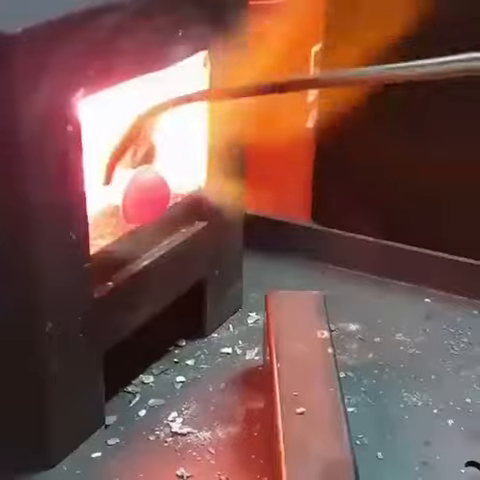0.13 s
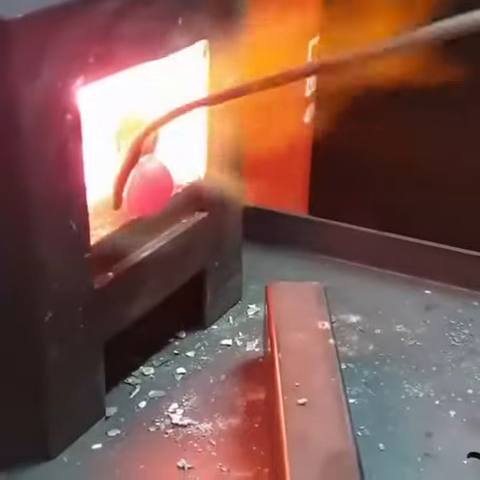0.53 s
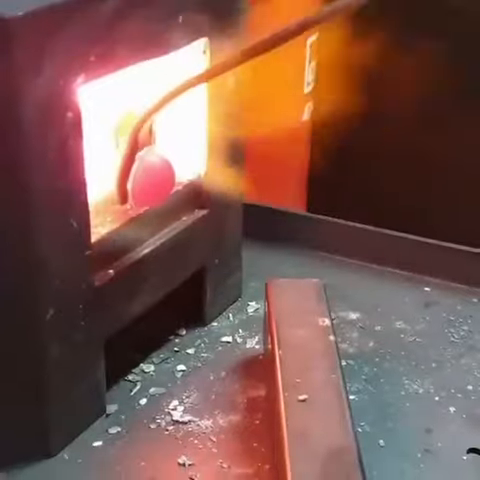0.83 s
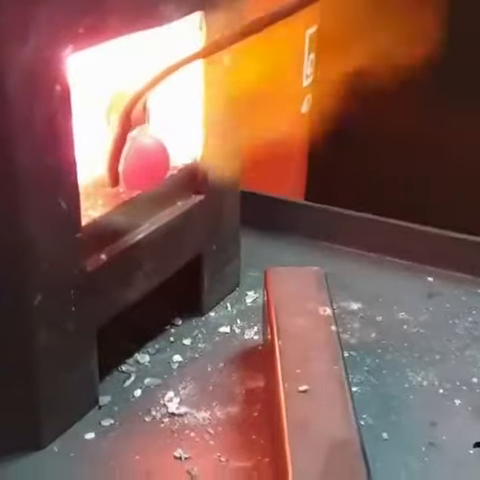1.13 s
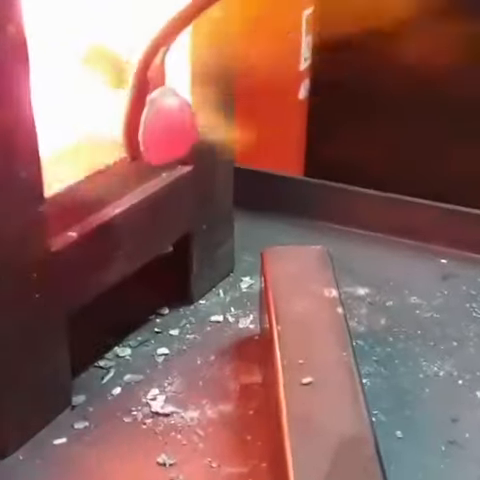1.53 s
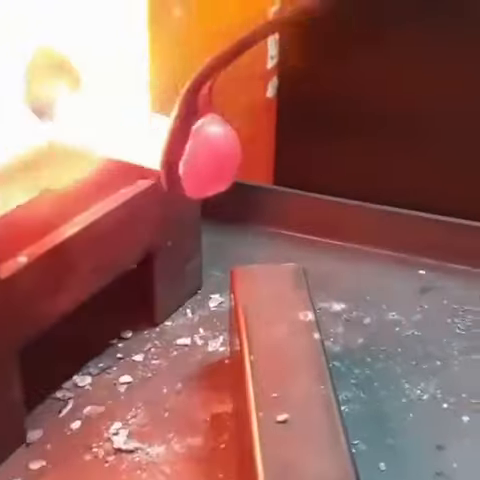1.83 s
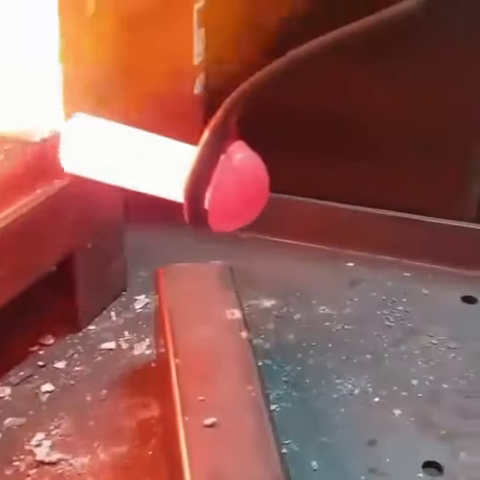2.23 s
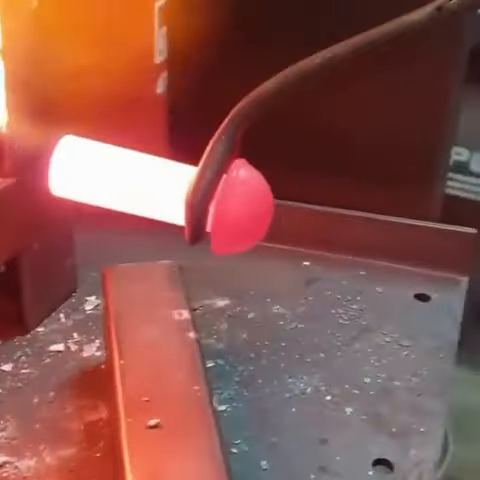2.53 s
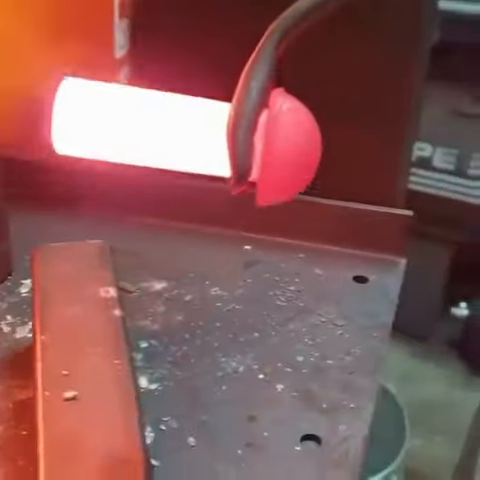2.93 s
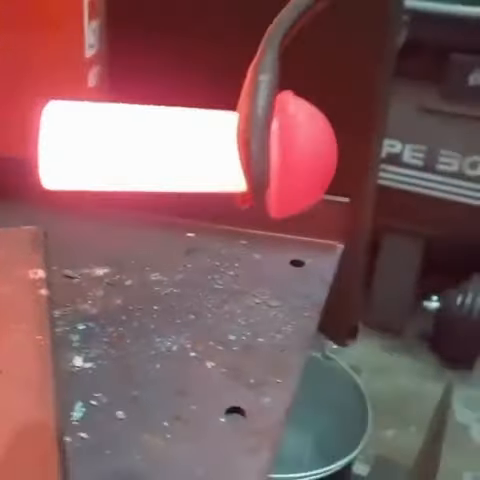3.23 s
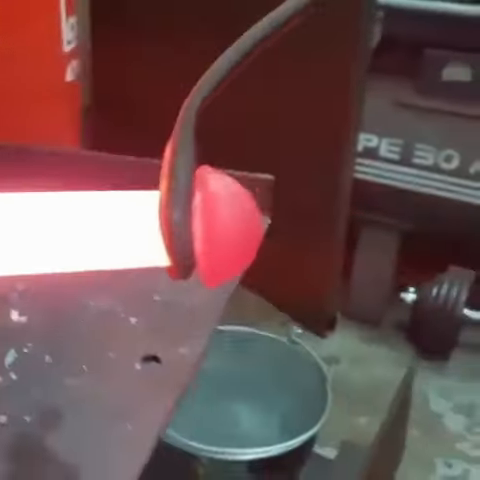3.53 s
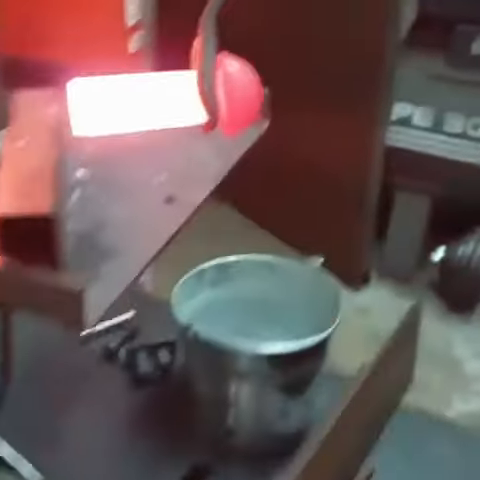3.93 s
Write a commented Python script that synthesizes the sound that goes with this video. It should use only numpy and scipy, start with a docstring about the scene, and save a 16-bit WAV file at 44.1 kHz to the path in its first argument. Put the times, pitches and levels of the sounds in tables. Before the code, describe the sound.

Abrupt onset of a low, fluttering furnace roar with burner hiss, ending in a metallic rasp, brief squeal and a clattering knock on sheet steel.

```python
"""After a short silence a gas furnace starts abruptly in a metal workshop: turbulent flame booms in the
fire box, the gas jet hisses through the burner tube and finer hiss lies above it, all as shaped noise.
The microphone swings away, tilting the tone; from 1.2 to 3.7 s a faint fuzzy edge tone is stronger.
Near the end a hot rivet is dragged over a steel tray, as random slips ringing the tray's modes, a broad
rasp and a drifting squeal, then it knocks the tray in a few short bursts."""
import sys
import numpy as np
from scipy import signal
from scipy.io import wavfile
from scipy.ndimage import uniform_filter1d

SR = 44100
rng = np.random.default_rng(int(sys.argv[2]) if len(sys.argv) > 2 else 0)


def wav_record(signal):
    """Record a signal, one row per channel, as 16-bit PCM in the file named by sys.argv[1]."""
    frames = np.transpose(np.atleast_2d(signal))
    bounded = np.clip(frames, -1, 1)
    # unit amplitude maps onto the largest positive 16-bit level
    quanta = np.round(bounded * 32767).astype(np.int16)
    wavfile.write(sys.argv[1], SR, quanta)


N = 180413

# Flame level, also followed in part by the fine hiss. Each row: time in seconds, level before the tilts in dB.
FLAME_LEVEL = [(.18, -18), (.4, -19), (.95, -18), (1.07, -19.5), (1.36, -17), (1.74, -17.5), (1.81, -15.5),
               (2.06, -15.5), (2.22, -17), (2.7, -15.5), (2.87, -17.5), (3.12, -15.5), (3.38, -17),
               (3.5, -18), (4.05, -20.5)]


def gain_of(db):
    """Amplitude factor of a level in dB."""
    return 10 ** (np.asarray(db) / 20)


def evened(x):
    """Scales to unit RMS."""
    return x / np.sqrt(np.mean(x ** 2) + 1e-20)


def curve(rows, column):
    """One column of a table, interpolated over the times in column 0 at every sample."""
    rows = np.array(rows)
    return np.interp(np.arange(N) / SR, rows[:, 0], rows[:, column])


def step(middle_s, fade_s):
    """Rises smoothly from 0 to 1 around middle_s."""
    return 0.5 + 0.5 * np.tanh((np.arange(N) / SR - middle_s) / fade_s)


def wander(lump_s):
    """Smooth unit-RMS noise with lumps about lump_s long."""
    size = round(lump_s * SR)
    smooth = uniform_filter1d(rng.standard_normal(N), size=size)
    return evened(uniform_filter1d(smooth, size=size))


def shelf(x, edge_hz, side, db):
    """Lifts or lowers one side of edge_hz, or the band between two edges, by a level curve."""
    sos = signal.butter(8, edge_hz, side, fs=SR, output="sos")
    part = signal.sosfiltfilt(sos, x)
    return x + (gain_of(db) - 1) * part


def turbulence(spectrum, modes=(), size=1024, patchy_db=1.5, flicker_db=1.0, drift=0.0, slide=((0, 1),)):
    """Noise from random short-time spectra, lifted at drifting resonances, with patches and a shared flicker."""
    frames = 4 * N // size + 5
    hz = np.fft.rfftfreq(size, 1 / SR)
    real, imag, patches = rng.standard_normal((frames, len(hz), 3)).T
    patches = uniform_filter1d(patches, size=8, axis=0)
    patches = evened(uniform_filter1d(patches, size=8, axis=1))
    flicker = evened(uniform_filter1d(rng.standard_normal(frames), size=3))
    point_hz, point_db = np.transpose(spectrum)
    colour_db = np.interp(np.log(hz + 1), np.log(point_hz + 1), point_db, -120, -120)
    # each resonance: common slide plus its own slow drift, as shares of its pitch
    slow = uniform_filter1d(rng.standard_normal((frames, len(modes) + 1)), size=SR // size, axis=0)
    frame_s = (np.arange(frames) - 2) * size / 4 / SR
    bends = np.interp(frame_s, *np.transpose(slide)) + drift * evened(slow).T
    lifts_db = 0
    for (centre_hz, width_hz, lift_db), bend in zip(modes, bends):
        offset = 2 * (hz[:, None] - centre_hz * bend) / width_hz
        lifts_db = lifts_db + lift_db / (1 + offset ** 2)
    level_db = lifts_db + patchy_db * patches + flicker_db * flicker
    spectra = (real + 1j * imag) * gain_of(colour_db[:, None] + level_db)
    return evened(signal.istft(spectra, nperseg=size, noverlap=3 * size // 4)[1][:N])


def sung(hz, width_hz):
    """A rough tone: slow complex noise, its swings partly evened, shifted up to a pitch curve."""
    r = np.exp(-np.pi * width_hz / SR)
    noise = rng.standard_normal((N, 2)) @ [1, 1j]
    slow = signal.lfilter([1], np.convolve([1, -r], [1, -r]), noise)
    carrier = np.exp(2j * np.pi * np.cumsum(hz) / SR)
    return evened((slow / np.sqrt(abs(slow)) * carrier).real)


def flame():
    """Lumpy burning excites the air modes of the fire box."""
    # Flame colour. Each row: frequency in Hz, relative level in dB per Hz.
    flame_colour = [(20, -46), (37, -60), (50, -28), (72, -36), (95, -12), (140, -5.5), (200, -1),
                    (300, -3), (400, -9.5), (500, -9.5), (600, -14.5), (900, -24), (1330, -35.5),
                    (1700, -37.5), (2200, -36), (2900, -46)]
    # Fire box air modes. Each row: centre in Hz, width in Hz, lift in dB.
    box_modes = [(56.3, 34, 15), (101, 37, 5), (164, 35, 3), (192, 38, 4.5), (242.4, 30, 3.5),
                 (361.3, 25, 5.5), (446.6, 36, 6), (488, 27, 6.5), (556, 20, 4), (633, 43, 8.5),
                 (703, 13.5, 5), (779, 71, 7.5), (939, 72, 7.5), (1114.5, 35, 9)]
    levelling_s, levelling_share = 0.06, 0.25
    flutter_db, flutter_s = 0.47, 0.014  # random lumps in the burning
    t = np.arange(N) / SR
    roar = turbulence(flame_colour, box_modes, size=4096, patchy_db=0.36, flicker_db=0.06, drift=0.011)
    # mild levelling: slow swings of the roar partly evened out
    power = uniform_filter1d(roar ** 2, size=round(levelling_s * SR))
    roar = evened(roar / power ** (levelling_share / 2))
    # rumble and furnace mouth: lift in dB at 0 s, then dB per s as the microphone turns
    roar = shelf(roar, 190, "low", 2.5 - 1.16 * t)
    roar = shelf(roar, [387, 590], "band", 2 - 1.21 * t)
    return gain_of(curve(FLAME_LEVEL, column=1) + flutter_db * wander(flutter_s)) * roar


def gas_jet():
    """Jet turbulence makes hiss, coloured by the burner tube and duller off its axis."""
    # Jet colour. Each row: frequency in Hz, relative level in dB per Hz.
    jet_colour = [(710, -37), (1200, -1), (1510, -15), (2130, -6), (2200, -7), (2300, 0.5), (2400, 0.5),
                  (2800, 1.5), (3710, -0.5), (5690, -9), (7000, -89), (9100, -81), (15400, -120)]
    # Burner tube resonances. Each row: centre in Hz before the slide, width in Hz, lift in dB.
    tube_modes = [(2310, 80, 4), (2473, 154, 7.5), (2650, 67, 2), (3180, 120, 4.5), (3580, 145, 5),
                  (3793, 230, 7.5), (4540, 250, 4.5), (5050, 340, 5.5)]
    # Tube resonances slide as the microphone moves. Each row: time in seconds, pitch factor.
    tube_slide = [(.2, 0.96), (.55, 0.97), (.9, 0.95), (1.4, 1), (1.8, .99), (2.6, 1.02), (3.2, 0.99),
                  (3.6, 1.01), (4., 1.1)]
    # Jet level. Each row: time in seconds, level before the low shelf in dB.
    jet_level = [(.19, -31), (.25, -32), (.32, -31.5), (.36, -35), (.47, -35), (.56, -36.5), (.65, -34),
                 (.8, -36), (.9, -37), (.97, -33), (1.08, -35), (1.3, -34.5), (1.5, -36), (1.9, -36),
                 (2.2, -37), (2.55, -37.5), (2.8, -36.5), (2.92, -38.5), (3.25, -37), (3.5, -37.5),
                 (3.7, -38.5), (4., -38.5)]
    surge_db, surge_s = 0.5, 0.032
    t = np.arange(N) / SR
    jet = turbulence(jet_colour, tube_modes, size=1024, patchy_db=1.46, flicker_db=0.5, drift=0.016,
                     slide=tube_slide)
    # brighter until about 0.32 s
    early = 1 - step(0.32, fade_s=0.03)
    jet = shelf(jet, 3850, "high", 1.5 * early)
    # as the microphone turns the treble falls and the low end, under the tube resonances, grows
    jet = shelf(jet, 3990, "high", 5 - 0.7 * t)
    jet = shelf(evened(jet), 2120, "low", -3.5 + 3.5 * t)
    return gain_of(curve(jet_level, column=1) + surge_db * wander(surge_s)) * jet


def fine_hiss():
    """Finer turbulence above the jet partly follows the flame level and swells in brief puffs."""
    # Hiss colour. Each row: frequency in Hz, relative level in dB per Hz.
    hiss_colour = [(3530, 0), (6000, 6), (6560, -8), (6880, -6), (7220, -1.5), (7800, -5.5), (8210, 4),
                   (9730, 0), (13200, 1), (14000, -9), (14500, -20)]
    # Faint bands. Each row: centre in Hz, width in Hz, lift in dB.
    hiss_bands = [(7450, 220, 7), (8260, 200, 5.5), (9150, 60, 5)]
    # Brief swells. Each row: middle in seconds, Gaussian length in seconds, lift in dB.
    puffs = [(1.352, .05, 2), (1.573, 0.032, 2), (1.742, .04, 3), (1.963, 0.027, 3.5), (2.744, 0.059, 2)]
    hiss_db, flame_ref_db, follow_share = -48, -17, 0.58  # hiss level when the flame is at flame_ref_db
    t = np.arange(N) / SR
    hiss = turbulence(hiss_colour, hiss_bands, size=512, patchy_db=0.6, flicker_db=0.6)
    puffs_db = sum(db * np.exp(-((t - middle_s) / length_s) ** 2) for middle_s, length_s, db in puffs)
    flame_db = curve(FLAME_LEVEL, column=1) - flame_ref_db
    return gain_of(hiss_db + follow_share * flame_db + puffs_db) * hiss


def whistle():
    """Burner edge tone: a fuzzy band wavering in pitch and level, 5 dB fainter outside 1.24 to 3.7 s."""
    on = step(1.24, fade_s=0.13) - step(3.7, fade_s=0.13)
    level_db = -50 - 5 * (1 - on) + 2.5 * wander(0.04)
    pitch_hz = 1680 + 14.9 * wander(0.0985)
    return gain_of(level_db) * sung(pitch_hz, width_hz=56)


def rivet_slips():
    """Dense random slips of uneven strength and either sign, at unit RMS."""
    slips_per_s = 7000
    strength_db = 4.6 * np.minimum(rng.exponential(1, N), 4)
    slips = gain_of(strength_db) * (rng.random(N) < slips_per_s / SR)
    return evened(slips * rng.choice([-1.0, 1.0], N))


def squeal():
    """The rub sings in a drifting band with a second, wider band above it."""
    # Each row: time in seconds, lower band pitch in Hz, its level in dB, upper band relative to it in dB.
    sing_path = [(3.64, 1559, -62, -20), (3.675, 1540, -39, -14), (3.73, 1505, -33, -12),
                 (3.76, 1500, -38, -8), (3.8, 1550, -35, -8), (3.83, 1600, -39, -2), (3.86, 1590, -33, -7),
                 (3.88, 1500, -35, -3), (3.92, 1457, -26.5, -4), (3.945, 1460, -31, -6),
                 (3.96, 1452, -26, -9), (3.985, 1520, -36, -7), (4.02, 1480, -41, -7),
                 (4.05, 1480, -60, -5)]
    width_hz, upper_ratio = 80, 1.44
    hz = curve(sing_path, column=1)
    lower = sung(hz, width_hz)
    upper = gain_of(curve(sing_path, column=3)) * sung(upper_ratio * hz, 2 * width_hz)
    return gain_of(curve(sing_path, column=2)) * (lower + upper)


def rivet_knocks():
    """Blows of the landing rivet: it chatters for a few cycles while in contact."""
    # Each row: start in seconds, blow level in dB, chatter frequency in Hz.
    knocks = [(4.066, -20, 2300), (4.0712, -14.5, 1830), (4.0795, -7.5, 1910), (4.077, -2.5, 410),
              (4.0848, 7, 7900), (4.083, -8, 2700), (4.0885, -14, 1700), (4.076, -1, 7100)]
    chatter_cycles = 3.5
    blows = np.zeros(N)
    for start_s, db, hz in knocks:
        cycles = np.arange(0, chatter_cycles, hz / SR)
        window = np.sin(np.pi * cycles / chatter_cycles) ** 2
        blow = gain_of(db) * window * np.sin(2 * np.pi * cycles)
        part = blows[round(start_s * SR):][:len(blow)]
        part += blow[:len(part)]
    return blows


def tray_ring():
    """Impulse response of the steel sheet: decaying modes of alternating sign, at unit energy."""
    # Each row: frequency in Hz, relative level in dB, 60 dB decay time in seconds.
    tray_modes = [(468, -15.5, 0.08), (840, 2, 0.055), (1043, 5.5, 0.22), (1310, -1, 0.09),
                  (1510, -14, 0.3), (1590, -2, 0.074), (1713, 4, 0.11), (2010, 3, 0.069),
                  (1851, 2.5, 0.086), (2160, -4.5, 0.16), (2204, 2.5, 0.1), (2350, 0, 0.067),
                  (2600, 2, 0.12), (2794, -0.5, 0.11), (3200, -2, .07), (3650, -1, 0.087),
                  (4080, -4, 0.087), (4800, -6, 0.06), (6820, -16, 0.047), (6600, -31, 0.045),
                  (8320, -15, 0.064), (11100, -42, .04)]
    t = np.arange(SR // 4) / SR
    ring = np.zeros(len(t))
    for k, (hz, db, t60_s) in enumerate(tray_modes):
        ring += (-1) ** k * gain_of(db - 60 * t / t60_s) * np.sin(2 * np.pi * hz * t)
    return ring / np.linalg.norm(ring)


def rivet_on_tray():
    """Slips and blows ring the same sheet; rasping scale, squeal and the bare contact sound beside it."""
    # Rub strength. Each row: time in seconds, level in dB before the slip and grit offsets.
    rub_level = [(3.3, -75), (3.52, -51), (3.65, -42), (3.69, -35), (3.74, -33), (3.77, -35), (3.84, -30),
                 (3.9, -28), (3.96, -31.5), (4.0, -30), (4.03, -32.5), (4.062, -29), (4.075, -23.5),
                 (4.09, -20.5)]
    # Broad rasp of scale under the rivet. Each row: frequency in Hz, relative level in dB per Hz.
    grit_colour = [(410, -44), (700, -4), (866, 1.5), (1160, -8.5), (1470, 1), (1700, -5.5), (2140, -5.5),
                   (2610, -14), (3750, -10.5), (4820, -23), (14000, -34.5)]
    slip_offset_db, grit_offset_db, direct_db = -4.0, 1.5, -20
    stroke = gain_of(curve(rub_level, column=1))
    blows = rivet_knocks()
    force = gain_of(slip_offset_db) * stroke * rivet_slips() + blows
    rung = signal.oaconvolve(force, tray_ring())[:N]
    rasp = turbulence(grit_colour, size=256, patchy_db=0.5, flicker_db=0.1)
    grit = gain_of(grit_offset_db) * stroke * rasp
    return rung + grit + squeal() + gain_of(direct_db) * blows


def scene():
    """Sum of furnace and rivet sounds, one channel."""
    furnace = flame() + gas_jet() + fine_hiss() + whistle()
    return (furnace + rivet_on_tray())[None]


def record(dry):
    """Silence until the sound is switched on; duller above 9.3 kHz until about 0.29 s; then the band limit."""
    start_s, rise_s = 0.1767, 0.000057
    band_limit_hz = 14150
    on = np.clip((np.arange(N) / SR - start_s) / rise_s, 0, 1)
    treble_db = -12 * (1 - step(0.29, fade_s=0.013))
    out = shelf(dry[0], 9300, "high", treble_db) * on
    lowpass = signal.firwin(511, band_limit_hz, window=("kaiser", 9), fs=SR)
    return signal.oaconvolve(out, lowpass, "same")[None]


dry = scene()
out = record(dry)
wav_record(out)
```